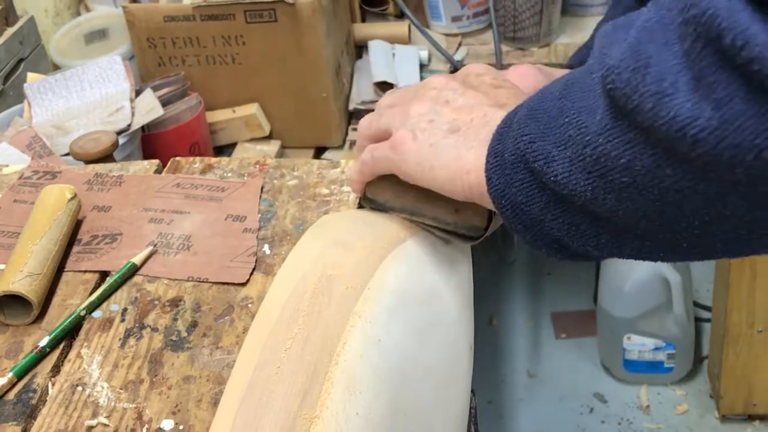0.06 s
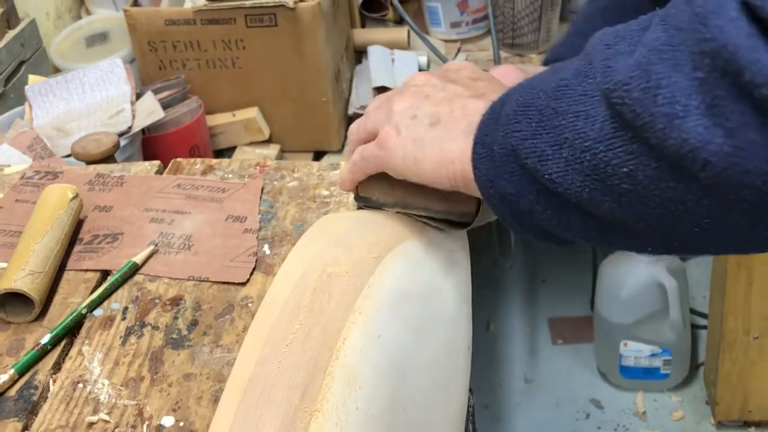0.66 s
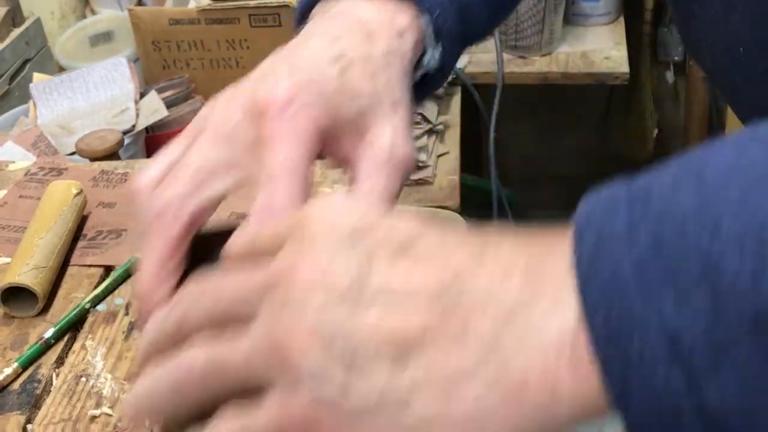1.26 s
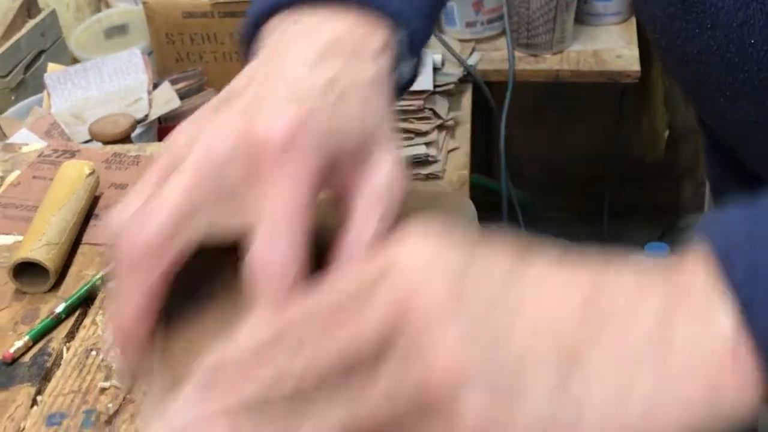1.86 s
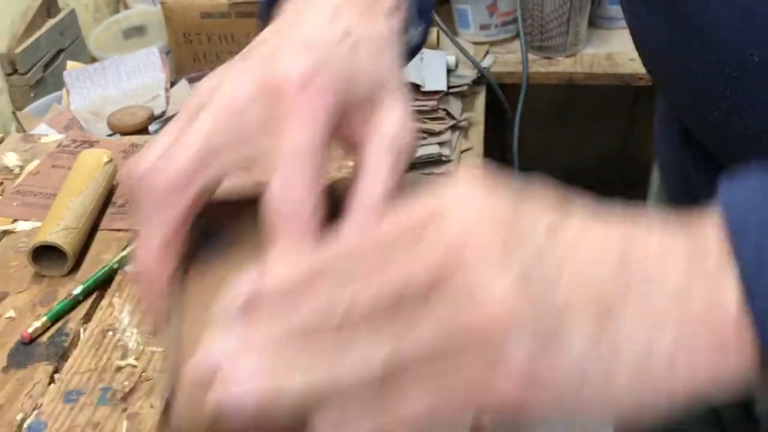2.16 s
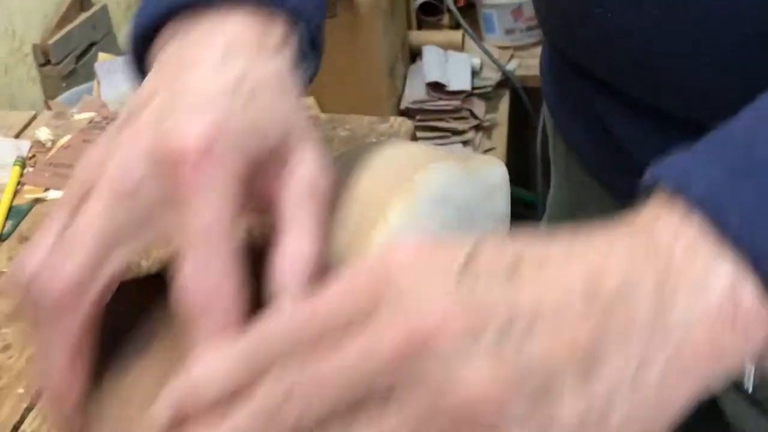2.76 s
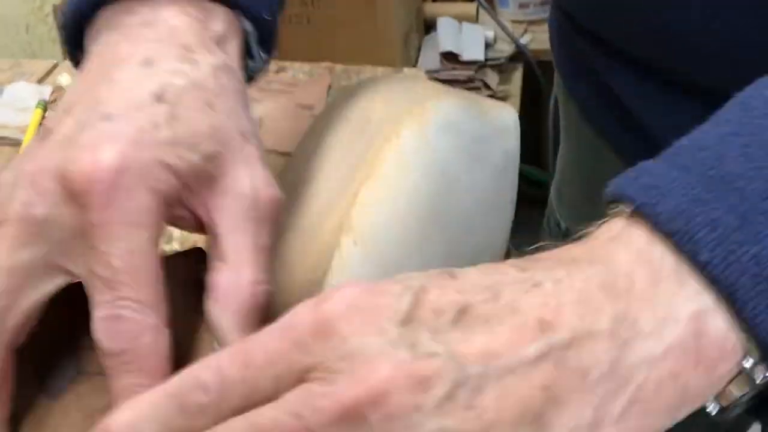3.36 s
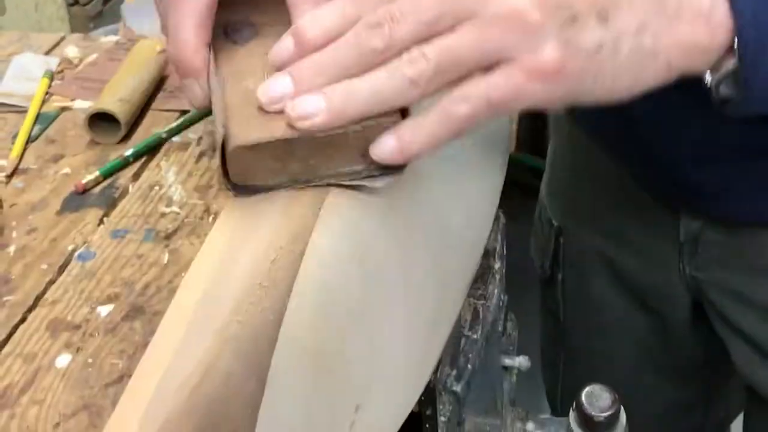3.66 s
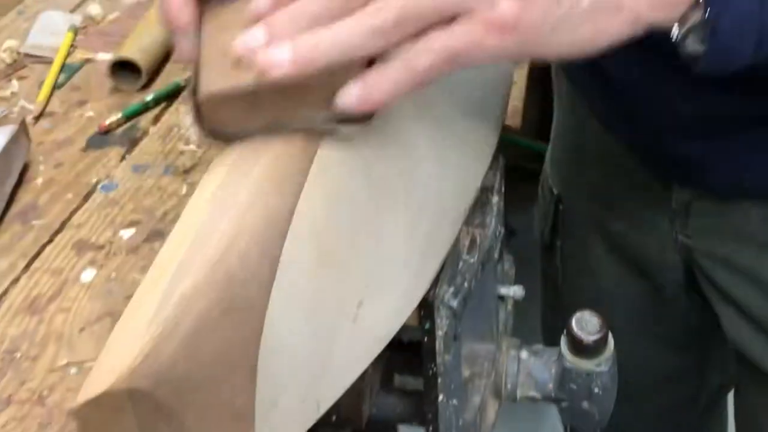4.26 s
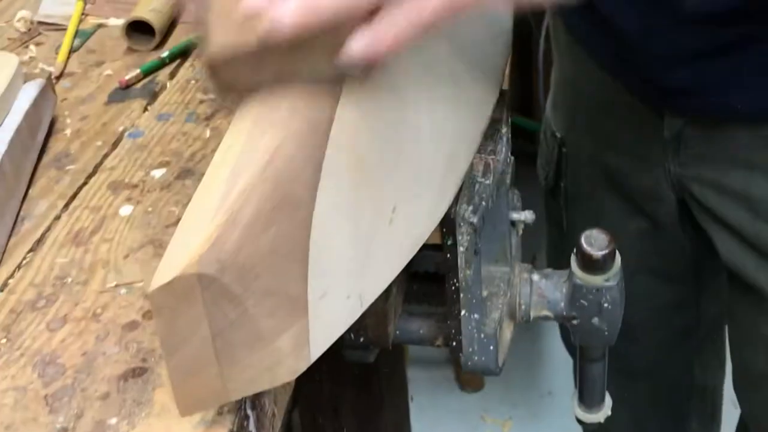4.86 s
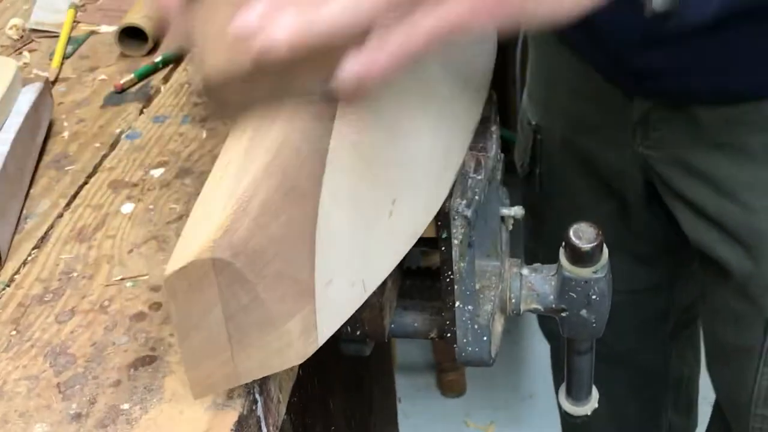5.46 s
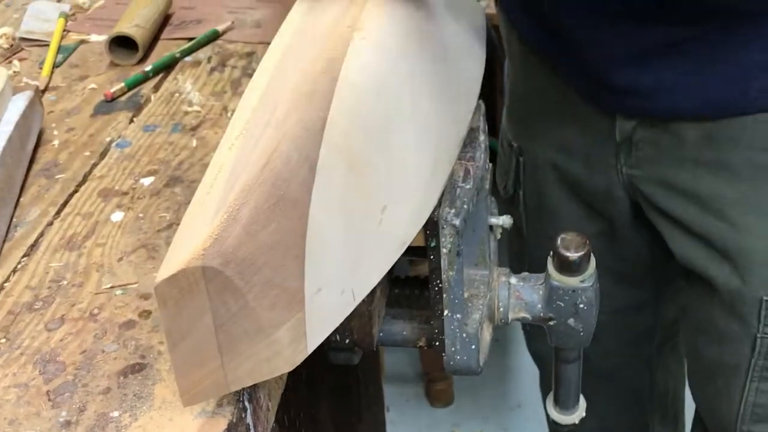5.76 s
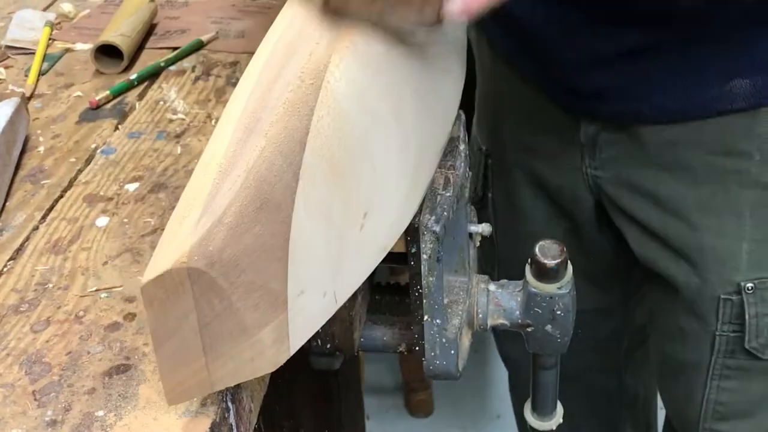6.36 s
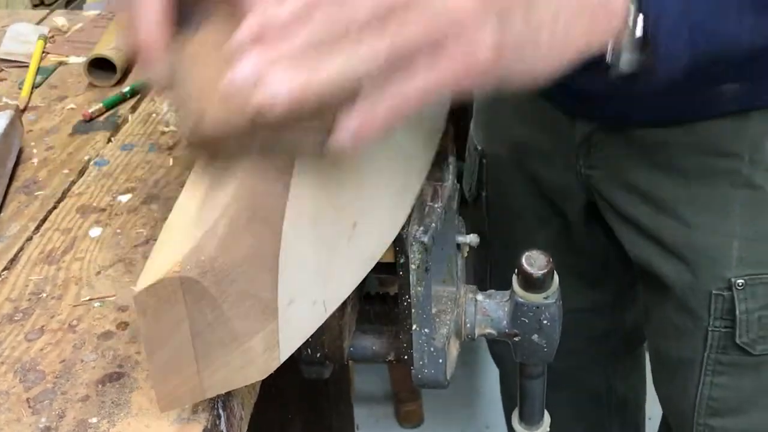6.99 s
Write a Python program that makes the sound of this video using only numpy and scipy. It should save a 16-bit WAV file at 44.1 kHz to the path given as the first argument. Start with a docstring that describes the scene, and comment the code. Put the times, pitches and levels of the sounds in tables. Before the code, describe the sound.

A sanding block rubs back and forth along wood in quick, gritty, hissing strokes, close up in a small workshop.

```python
"""A sanding block, pushed to and fro along a wooden boat hull in a vice, close to a mono microphone.
The grit hisses, brighter as the block speeds up; hull and block ring under the friction, and the hull
is nudged at each turn. Now and then the block knocks on the wood. Around it is a small workshop:
quick echoes off the bench, a short room tail, still air and a faint mains hum."""
import sys
import numpy as np
from scipy import signal
from scipy.fft import rfft, irfft, next_fast_len
from scipy.io import wavfile
from scipy.ndimage import uniform_filter1d, map_coordinates

SR = 44100
rng = np.random.default_rng(int(sys.argv[2]) if len(sys.argv) > 2 else 0)


def file_out(sig):
    """Save sig as 16-bit WAV at sys.argv[1]."""
    # one column per channel
    cols = np.atleast_2d(sig).T
    # limit, then scale
    lim = np.clip(cols, -1, 1)
    pcm = np.round(lim * 32767).astype(np.int16)
    wavfile.write(sys.argv[1], SR, pcm)


N = 314433
TIME = np.arange(N) / SR


def sanding(ring_near_db=0.5, ring_far_db=-26):
    """Close to the microphone, the grit hisses and sets hull, block and the hollow between ringing."""
    level_db, brightness_db, place, hull_db, hollow_db = strokes()
    hull_db = hull_db + ring_near_db + (ring_far_db - ring_near_db) * place  # most at the near end
    # the tones depend more on pressure than on speed, so they stand out as the hiss dulls
    hull = amp(hull_db - 0.12 * brightness_db) * hull_ring()
    block = amp(-0.5 * brightness_db) * block_ring()
    hollow = amp(hollow_db - 0.21 * brightness_db) * hollow_tone(place)
    return amp(level_db) * (scrape(brightness_db) + hull + block + hollow + resonant_swells())


# Strokes along the hull. Jerk is the speed on breaking free, peak the share of the stroke before top
# speed; a small arch is flat, a large one peaked; place runs from 0 (near) to 1 (far). Levels are relative.
# start_s, length_s, level_db, jerk_share, peak_share, arch_power, creep_db, brightness_db, end_place,
# hull_db, hollow_db, nudge_db
STROKES = [(-0.1, 0.28, -39, 0.53, 0.53, 0.82, -25, -0.5, 0.34, -2.5, -16, -80.0),
           (0.209, 0.25, -38.5, 0.39, 0.57, 0.91, -25.0, -0.0, 0.7, -2, -25, -71),
           (0.487, 0.27, -39, 0.25, 0.43, 0.65, -27, 0.5, 0.56, 5, -19.0, -62),
           (0.779, 0.48, -39.5, 0, 0.51, 0.41, -23, 1.5, 0.61, 5, -23.0, -77),
           (1.294, 0.34, -42, 0.11, 0.42, 0.43, -14.5, 0, 0.55, 2.5, -24.0, -64),
           (1.646, 0.42, -39.0, 0.0, 0.8, 0.31, -23, 1.0, 0.088, -1, -21, -68),
           (2.104, 0.34, -38.0, 0, 0.37, 0.57, -21, 0.5, 0.77, -7.5, -14.5, -66),
           (2.459, 0.32, -36.5, 0.34, 0.67, 1.27, -18, 2.5, 0.26, 1.5, -13, -67.0),
           (2.805, 0.29, -38, 0.13, 0.38, 0.42, -23, 1, 0.9, 0.0, -11.5, -67),
           (3.133, 0.34, -37.0, 0.27, 0.6, 1.01, -25, 3, 0.19, 5, -12, -74),
           (3.487, 0.262, -38.5, 0.079, 0.42, 0.45, -21, 1.5, 0.49, -0.5, -11.5, -65),
           (3.772, 0.31, -38.0, 0.35, 0.43, 1.1, -27, 2.5, 0.05, 1.0, -21, -60),
           (4.107, 0.27, -38.0, 0.045, 0.49, 0.63, -21.5, 0.5, 0.45, -3.5, -15.5, -59),
           (4.4, 0.3, -40.0, 0.56, 0.46, 0.94, -26, 0.5, 0.03, 1.0, -16, -64),
           (4.733, 0.29, -39, 0.17, 0.54, 0.8, -21, 0, 0.56, -3, -15.0, -56),
           (5.039, 0.27, -41.0, 0.27, 0.44, 0.7, -24.5, 0.5, 0.13, 0.5, -10.5, -67),
           (5.358, 0.418, -38.5, 0.14, 0.52, 0.76, -23, 1.5, 0.57, -4, -10, -60.0),
           (5.793, 0.39, -38.0, 0.29, 0.54, 1.2, -24.0, 2.5, 0.084, -4, -10.5, -64),
           (6.191, 0.35, -38.5, 0.11, 0.35, 0.65, -25, 1.5, 0.72, -3.5, -10.0, -53.5),
           (6.558, 0.36, -38, 0, 0.56, 0.57, -20, 1, 0.067, -3, -6.5, -61),
           (6.952, 0.347, -38, 0.04, 0.48, 0.45, -20, -0.0, 0.66, -8, -9.5, -51)]

def strokes(origin=0.2, break_free_s=0.009, uneven_db=0.5, bright_per_db=0.62, dullest_db=-8):
    """The block sticks, breaks free, speeds up and slows to a creep; speed sets level and brightness."""
    speed, place, which = np.zeros(N), np.full(N, origin), np.zeros(N, int)
    for k, (start, length, _, jerk, peak, arch, _, _, goal, *_) in enumerate(STROKES):
        now = TIME >= start
        age = TIME[now] - start
        done = np.clip(age / length, 0, 1)
        swing = np.pi * done * (1 - peak) / (done * (1 - peak) + (1 - done) * peak)
        freed = np.minimum(age / break_free_s, 1)
        speed[now] = freed * abs(np.sin(swing) + jerk * (1 - done) ** 2) ** arch
        place[now] = origin + (goal - origin) * (1 - np.cos(swing)) / 2
        which[now], origin = k, goal
    start, length, level_db, _, _, _, creep_db, bright_db, _, hull_db, hollow_db, _ = np.transpose(STROKES)
    creep = amp(np.interp(TIME, start + length, creep_db))
    speed_db = 20 * np.log10(np.hypot(speed, creep))
    pressure_db = uneven_db * wander(22)  # the hands never press quite evenly
    brightness_db = bright_db[which] + np.maximum(bright_per_db * speed_db, dullest_db)
    return level_db[which] + speed_db + pressure_db, brightness_db, place, hull_db[which], hollow_db[which]


def grit(per_s=30000, spread_db=1.1, chatter_db=0.22, chatter_per_s=260):
    """Grains catch and tear fibres as tiny clicks, in clumps because the paper chatters."""
    size = amp(spread_db * np.minimum(rng.exponential(1, N), 4)) * rng.standard_normal(N)
    clicks = size * (rng.random(N) < per_s / SR)
    return unit_rms(clicks * amp(chatter_db * wander(chatter_per_s)))


# Spectrum of sandpaper on wood, from close up: frequency_hz, relative_db
SCRAPE_SPECTRUM = [(100, -22), (400, -23.5), (800, -13), (1100, -8), (1750, -0.5), (2650, -2.5),
                   (3200, 1.5), (4400, 3), (4950, -1.5), (5400, 0.5), (7100, 1), (7700, -1.5), (8500, 0.5),
                   (9500, 0), (10450, -4.5), (11600, 0), (15800, -3.5)]
# Faster grit makes shorter clicks: frequency_hz, gain_db_per_brightness_db
SPEED_TILT = [(500, -2), (2000, -0.64), (4300, 0), (7000, 0.33), (10000, 0.93), (16000, 1.17)]

def scrape(brightness_db, gain_db=4.0, patchy_db=1.1):
    """The hiss tilts towards the treble with speed; its colour drifts as the contact patch changes."""
    hz, t, hiss = signal.stft(colour(grit(), SCRAPE_SPECTRUM), SR, nperseg=256)
    tilt_db = read(SPEED_TILT, hz)[:, None] * np.interp(t, TIME, brightness_db + 0.5)
    patches = uniform_filter1d(rng.standard_normal(hiss.shape), size=4, axis=0)  # smooth in frequency
    patches = unit_rms(uniform_filter1d(patches, size=36, axis=1))  # and in time
    shaped = hiss * amp(tilt_db + patchy_db * patches)
    return amp(gain_db) * signal.istft(shaped, SR, nperseg=256)[1][:N]


# Modes of the hull in the vice: pitch_hz, width_hz, relative_db
HULL_MODES = [(1297.7, 30.5, 2.5), (1310, 140, -11), (1483, 9.2, -13), (1884, 71, -9.5)]

def hull_ring():
    """Rubbing makes the modes of the hull sing."""
    return sum(amp(db) * sing(rng.standard_normal(N), hz, width) for hz, width, db in HULL_MODES)


# Modes of the hand-held block: pitch_hz, width_hz, relative_db
BLOCK_MODES = [(632.4, 33, -21), (584, 46, -32.5), (686, 29, -29.5), (958, 112, -25.5), (1474, 38, -18.5),
               (3086, 47, -17), (3303, 115, -14.5)]

def block_ring():
    """The drag of the grit rings the block."""
    drag = grit()
    return sum(amp(db) * resonate(drag, hz, width) for hz, width, db in BLOCK_MODES)


def hollow_tone(place, near_hz=1410, far_hz=1895, bend=1.77):
    """The hollow between block and hull rises in pitch as the block moves away."""
    return sing(grit(), near_hz + (far_hz - near_hz) * place ** bend, width_hz=110)


def sing(x, hz, width_hz, steadiness=0.27):
    """A rubbed mode feeds back on the friction, which evens out its swings into a half-sung tone."""
    ring = resonate(x, hz, width_hz)
    power = abs(uniform_filter1d(ring ** 2, size=300))
    return unit_rms(ring / (power + 0.1) ** (steadiness / 2))


# Swells within the scraping: centre_s, spread_s, pitch_hz, width_hz, relative_db
RESONANT_SWELLS = [(1.045, 0.042, 3100, 450, -6), (1.5, 0.2, 7340, 600, -10), (1.95, 0.16, 6450, 1400, -4),
                   (1.99, 0.045, 3140, 150, -3), (2.18, 0.11, 1800, 577, -6.5), (2.34, .07, 6100, 450, -4),
                   (2.925, .02, 1900, 90, -4), (5.537, 0.11, 3670, 900, -3), (6.297, 0.078, 3850, 650, 2)]

def resonant_swells():
    """Brief resonant swells colour the scraping; the short one at 1900 Hz is the hollow tone peaking."""
    out, clicks = np.zeros(N), grit()
    for centre, spread, hz, width, db in RESONANT_SWELLS:
        pole = np.exp((2j * np.pi * hz - np.pi * width) / SR)
        ring = signal.lfilter([1, 0, -1], np.poly([pole, pole.conjugate()]).real, clicks)
        out += amp(db) * swell(centre, spread) * unit_rms(ring)
    return out


# The block knocks on the wood: start_s, level_db, pitch_factor
KNOCKS = [(2.452, -56, 0.83), (2.829, -51, 0.89), (3.138, -53, 0.88), (4.459, -42, 1), (4.477, -46, 0.6),
          (6.561, -49.5, 1.1)]
# Modes of the knocked wood: base_pitch_hz, relative_db, t60_s
KNOCK_MODES = [(244, -3, 0.12), (376, -2.5, 0.1), (448, 3.5, 0.056), (748, -6, 0.059)]

def knocks(rise_s=0.00097):
    """Dull blows of block on wood, damped by the hands."""
    out, t = np.zeros(N), np.arange(SR // 5) / SR
    for start, db, pitch in KNOCKS:
        ring = sum(amp(db + mode_db - 60 * t / t60) * np.sin(2 * np.pi * hz * pitch * t)
                   for hz, mode_db, t60 in KNOCK_MODES)
        part = out[round(start * SR):][:len(t)]
        part += (ring * (1 - np.exp(-t / rise_s)))[:len(part)]
    return out


# Spectrum of the shudder in hull and bench: frequency_hz, relative_db
NUDGE_SPECTRUM = [(10, -55), (27, -25), (42, -4), (60, 12), (90, -7), (150, 5.5), (230, -6.5), (400, -20),
                  (1000, -59)]

def nudges(delay_s=0.045, spread_s=0.044, gain_db=-1):
    """Hull and bench take the push with a soft low shudder just after each stroke sets off."""
    pushes = sum(amp(db) * swell(start + delay_s, spread_s) for start, *_, db in STROKES)
    return amp(gain_db) * pushes * colour(rng.standard_normal(N), NUDGE_SPECTRUM)


def bench_echoes(x, near_s=0.002, far_s=0.012, travel_s=0.001403, gain=0.16, count=5):
    """Nearby bench and clutter throw back echoes whose delays slide as the block travels to and fro."""
    turns = [start for start, *_ in STROKES]
    away = (1 - np.cos(np.pi * np.interp(TIME, turns, np.arange(len(turns))))) / 2
    delays = [rng.uniform(near_s, far_s) + travel_s * rng.uniform(0.495, 1) * away for _ in range(count)]
    echoes = sum(map_coordinates(x, [(TIME - delay) * SR], order=3) for delay in delays)
    return (x + gain * echoes) / np.sqrt(1 + count * gain ** 2)


# Decay of the small workshop: frequency_hz, t60_s
ROOM_DECAY = [(150, 0.85), (1000, 0.32), (4000, 0.2), (16000, 0.17)]

def workshop(x, tail_db=-16, gap_s=0.006):
    """The room adds a short tail in which the treble dies first."""
    t = np.arange(SR // 2) / SR
    hz, age, noise = signal.stft(rng.standard_normal(len(t)) * (t > gap_s), SR, nperseg=256)
    decay = amp(-60 * age / read(ROOM_DECAY, hz)[:, None])
    tail = signal.istft(noise * decay, SR, nperseg=256)[1][:len(t)]
    return x + signal.fftconvolve(x, amp(tail_db) * tail / np.linalg.norm(tail))[:N]


# Partials of the mains hum: pitch_hz, mean_level_db
HUM_PARTIALS = [(59, -75), (120, -71.5), (240, -74), (359, -78.5)]

def mains_hum(waver_db=1.8, approach_db=7.0):
    """A faint, wavering hum that grows as the microphone moves along the bench."""
    hum = sum(amp(db) * np.sqrt(2) * np.sin(2 * np.pi * (hz * TIME + rng.random()))
              for hz, db in HUM_PARTIALS)
    return hum * amp(waver_db * wander(3.83) + approach_db * (TIME / TIME[-1] - 0.5))


# Spectrum of the workshop's room tone: frequency_hz, relative_db
AIR_SPECTRUM = [(10, -60), (30, -36), (44, -20), (75, -13), (95, -1), (150, 3), (290, -3), (600, -4),
                (1500, -11), (5000, -21.5), (16000, -38)]

def room_air(level_db=-63):
    """Still air all around the microphone."""
    return amp(level_db) * colour(rng.standard_normal(N), AIR_SPECTRUM)


def amp(db):
    """Decibels to gain."""
    return 10 ** (np.asarray(db) / 20)


def unit_rms(x):
    """Scales to rms 1."""
    return x / np.sqrt(np.mean(x ** 2) + 1e-20)


def read(points, hz):
    """Reads a table on a log-frequency axis."""
    f, value = np.transpose(points)
    return np.interp(np.log(hz + 1), np.log(f + 1), value)


def colour(x, spectrum):
    """Filters by a spectrum, to rms 1."""
    size = next_fast_len(N)
    gain = amp(read(spectrum, np.fft.rfftfreq(size, 1 / SR)))
    return unit_rms(irfft(rfft(x, size) * gain, size)[:N])


def swell(centre_s, spread_s):
    """A bell-shaped rise and fall."""
    return np.exp(-((TIME - centre_s) / spread_s) ** 2 / 2)


def wander(per_s):
    """A smooth random curve of rms 1 that takes a new value per_s times a second."""
    return unit_rms(map_coordinates(rng.standard_normal(8192), [TIME * per_s], order=3, mode="wrap"))


def resonate(x, hz, width_hz):
    """A steady or moving resonance with steep skirts, to rms 1."""
    carrier = np.exp(2j * np.pi * np.cumsum(hz * np.ones(N)) / SR)
    baseband = x / carrier
    for width in (width_hz, 5 * width_hz):
        pole = np.exp(-np.pi * width / SR)
        baseband = signal.lfilter([1 - pole], [1, -pole], baseband)
    return unit_rms((carrier * baseband).real)


def scene():
    """Everything reaches one microphone at the bench, heard alike in both ears."""
    at_bench = bench_echoes(sanding()) + knocks() + nudges()
    mono = workshop(at_bench) + mains_hum() + room_air()
    return np.array([mono, mono])


def record(dry):
    """The recorder passes nothing much above 15.8 kHz."""
    lowpass = signal.firwin(511, 15780, window=("kaiser", 9), fs=SR)
    return signal.oaconvolve(dry, lowpass[None], "same")


dry = scene()
out = record(dry)
file_out(out)
```